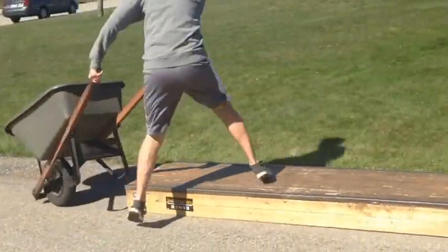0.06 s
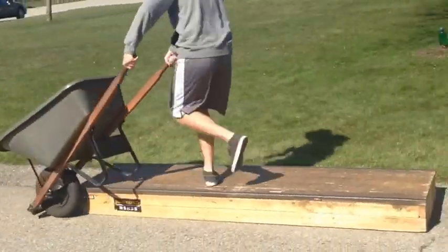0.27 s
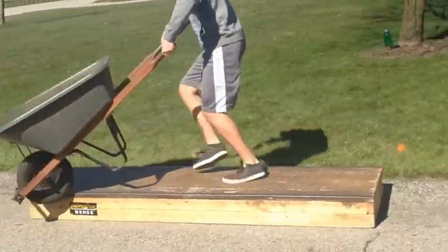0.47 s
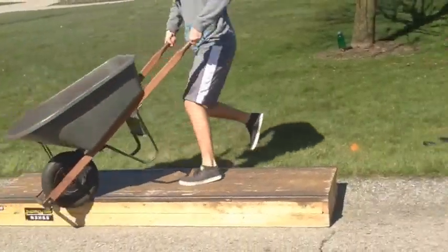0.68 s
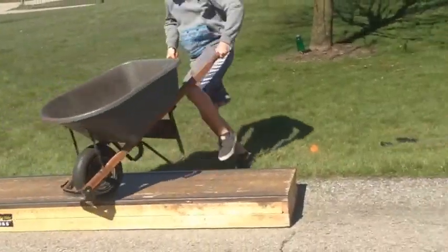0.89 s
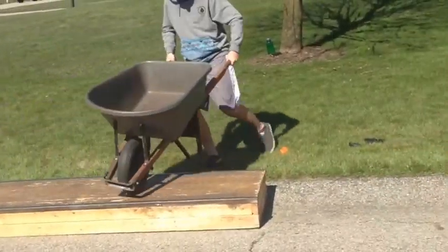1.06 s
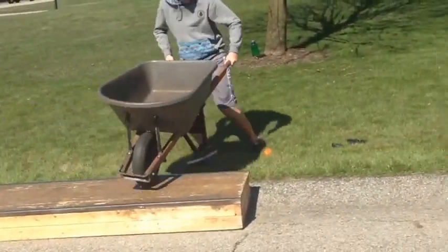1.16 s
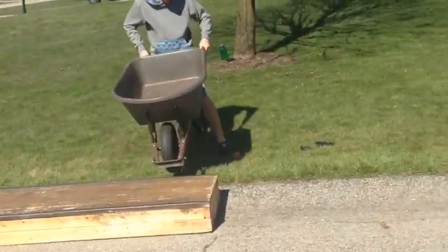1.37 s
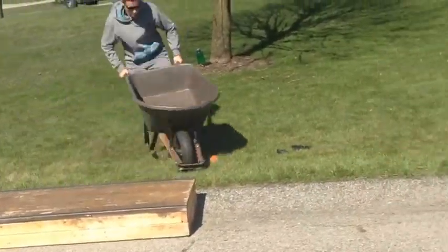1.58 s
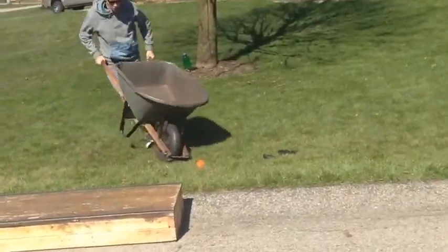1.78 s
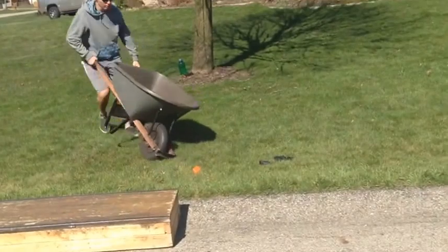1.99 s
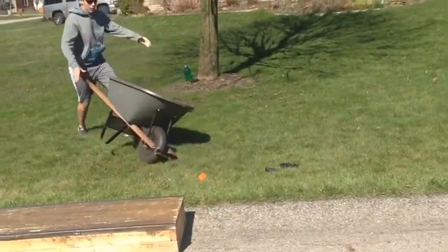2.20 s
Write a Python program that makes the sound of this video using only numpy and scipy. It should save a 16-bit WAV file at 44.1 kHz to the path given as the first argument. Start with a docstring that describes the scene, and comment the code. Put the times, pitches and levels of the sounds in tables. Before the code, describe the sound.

A wheelbarrow bumps and crashes onto a hollow wooden platform, rattles along, then drops onto grass

```python
"""Shoes and tyre scuff, then a wheelbarrow bumps onto a hollow wooden platform and crashes down.
It rolls along the creaking boards and drops off onto grass, while loose steel parts clank to the end.
Blows are bursts of noise with ringing tray modes; deck booms are decaying low tones with a hollow knock.
Creaks are sagging chirps with rasp, clanks are chattering steel modes, scuffs are clumped noise.
Rolling is coloured noise at a varying level, and faint coloured noise is the open air throughout."""
import sys
import numpy as np
from scipy import signal
from scipy.fft import rfft, irfft
from scipy.io import wavfile

SR = 44100
rng = np.random.default_rng(int(sys.argv[2]) if len(sys.argv) > 2 else 0)


def wav_out(sig):
    """Save sig, one row per channel (or a flat mono array), as 16-bit PCM at SR to the path in sys.argv[1]."""
    wavfile.write(sys.argv[1], SR, np.round(np.clip(np.atleast_2d(sig).T, -1, 1) * 32767).astype(np.int16))


N = 99225  # samples, 2.25 s

# Spectrum of the open air. Each row: frequency in Hz, relative density in dB per Hz.
AIR_SPECTRUM = [(20, 1), (50, 9.5), (110, 1), (300, -12), (1000, -11.5), (3000, -13.5), (6000, -26.5),
                (10000, -38), (15500, -42)]
AIR_DB = -52

# Rolling. Each row: time in seconds, level of the tyre's rumble in dB, level of the frame's rattle in dB.
ROLLING_LEVELS = [(0, -48.5, -50.5), (.38, -42, -48.5), (.55, -34.5, -34.5), (0.722, -38, -42.5),
                  (.9, -37.5, -41.5), (1.2, -44, -31), (1.42, -43.5, -48.5), (1.65, -42.5, -53),
                  (1.92, -44, -47.5), (2.03, -47, -48), (2.15, -47.5, -56.5), (2.25, -55, -41.5)]
# Spectrum of the tyre's rumble. Each row: frequency in Hz, relative density in dB per Hz.
RUMBLE_SPECTRUM = [(20, -61), (45, -10), (70, 1.5), (110, 1.5), (170, -5.5), (300, -11), (700, -54.5),
                   (3000, -60)]
# Spectrum of the frame's rattle. Each row: frequency in Hz, relative density in dB per Hz.
RATTLE_SPECTRUM = [(100, 23), (350, 3.5), (700, 10), (1200, -6), (2000, -8.5), (3200, -5), (5000, -14),
                   (7500, -39.5), (15500, -48)]
RATTLE_ROUGH, RATTLE_SWAY_DB, RATTLE_SWAYS_PER_S = 0.42, 1, 44.14

# Scuffs of shoes and tyre. Each row: start in seconds, length in seconds, level in dB, treble in dB.
SCUFF_EVENTS = [(0.072, 0.051, -46, 1), (0.135, 0.052, -46, 20), (0.159, 0.041, -31.5, 8.5),
                (.279, 0.019, -38.5, -7.5), (0.3344, 0.016, -39, -5), (0.403, 0.031, -24.5, 0),
                (0.558, 0.12, -34, -3), (0.765, 0.042, -44.5, 1), (0.7943, 0.026, -35, 10.5),
                (0.929, 0.06, -39, 10), (1.498, 0.048, -38.5, 2), (1.746, 0.096, -41, -6.5),
                (1.848, 0.06, -45.5, -8), (2.207, 0.055, -50, -3)]
# Spectrum of a scuff. Each row: frequency in Hz, relative density in dB per Hz.
SCUFF_SPECTRUM = [(80, -40), (400, 11.5), (900, 6.5), (1800, 5.5), (3000, 5), (4500, -5), (7000, -25.5),
                  (10000, -41), (15500, -49)]
SCUFF_RISE_S, SCUFF_ROUGH = 0.002, 0.2

# Contacts of loose steel parts. Each row: start in seconds, level in dB, treble in dB,
# chatter length in seconds, frequency favoured among the modes in Hz, jingle level in dB.
CLANK_EVENTS = [(.829, -33.5, 8.5, 0.018, 1500, -69), (0.925, -43, 15, 0.0056, 4400, -53),
                (1.069, -27.5, 0.5, 0.016, 1435, -44), (1.232, -49.5, 17, .004, 7100, -59),
                (1.507, -43.5, -14, .015, 1520, -54), (1.587, -40.5, 1, .01, 1030, -52.5),
                (1.788, -44.5, -5, 0.025, 3095, -56), (1.890, -31, -5, 0.012, 880, -39.5),
                (1.9855, -43.5, 11, .004, 3160, -58), (2.088, -50.5, 2, 0.0033, 3040, -60),
                (2.2, -51.5, 2, .004, 3095, -63), (2.23, -47.5, -7, 0.022, 860, -57.5)]
# Modes of the steel. Each row: frequency in Hz, relative level in dB, 60 dB decay time in seconds.
STEEL_MODES = [(467, -1.5, 0.078), (697, 3, 0.12), (872, 0, 0.15), (974, 0, 0.087), (1501, -5.5, 0.16),
               (1585, -2, 0.13), (2059, -13, 0.48), (2187, -8, 0.96), (3070, -2.5, 0.18),
               (4370, -8.5, 0.17), (4810, -8.5, 0.11), (4970, -13, 0.19), (7200, -23.5, 0.15),
               (7500, -25, 0.11), (7730, -28, 0.095)]
STEEL_PAIR_SPLIT, STEEL_PAIR_DB = 0.025, -5  # relative spread of the neighbour modes, their level
STEEL_FOCUS_DB, STEEL_FOCUS_OCTAVES = 8, 0.11
CHATTER_DEPTH, CHATTER_PER_S = 0.56, 364
# Spectrum of the jingle. Each row: frequency in Hz, relative density in dB per Hz.
JINGLE_SPECTRUM = [(1500, -15), (3500, -4.5), (4600, 11), (6000, -8), (7500, 0.5), (8800, -15),
                   (11000, -17), (15500, -29)]
JINGLE_T60_S = 0.076

# Joints slipping under load. Each row: start in seconds, level in dB, nominal pitch in Hz,
# 60 dB decay time in seconds.
CREAK_EVENTS = [(.0728, -36, 3100, 0.031), (.134, -26, 4770, 0.0085), (.2015, -17, 2240, 0.031),
                (0.433, -11, 3340, 0.019), (0.544, -17.5, 4140, 0.012), (0.6177, -20, 3410, 0.014),
                (.6435, -18, 3636, 0.0081), (0.668, -23.5, 3710, 0.013), (.9530, -18.5, 2534, 0.023),
                (0.9606, -22.5, 2575, 0.042), (0.9877, -27.5, 2600, 0.028), (1.143, -25.5, 3650, 0.028),
                (1.222, -24, 2540, 0.017), (1.23, -21.5, 2560, 0.023), (1.244, -27, 2510, 0.013),
                (1.260, -33, 2500, .018), (1.269, -32.5, 2470, .018), (1.352, -39.5, 2740, .025),
                (1.6495, -25, 3685, .025), (1.6795, -34, 3750, .018)]
CREAK_RISE_S, CREAK_WIDTH, CREAK_TOP_HZ = 0.0005, 0.41, 6040  # width relative to the pitch
CREAK_TONE_DB, CREAK_NOISE_DB = -2, -1
CREAK_SAG, CREAK_SAG_S = 0.313, 0.0053  # total fall as a share of nominal pitch, its time constant

# Wheel and feet on deck and ground. Each row: start in seconds, level in dB, pitch in Hz,
# 60 dB decay time in seconds, level of the boards' hollow knock in dB.
THUD_EVENTS = [(0.211, -15, 91, 0.17, -29), (.447, 0, 107, 0.077, -18), (.457, -5, 102.3, 0.086, -14.5),
               (0.486, -23, 187.5, 0.29, -20), (0.519, -24, 122, 0.28, -33), (.595, -20.5, 85.5, 0.2, -39),
               (0.776, -24, 85, 0.089, -30), (0.834, -29, 89, 0.2, -22.5), (.944, -13.5, 86.3, 0.11, -30.5),
               (.974, -21.5, 102.5, 0.67, -31), (1.145, -19.5, 70, 0.093, -35),
               (1.213, -11.5, 100, 0.13, -22.5), (1.248, -8.5, 105, 0.12, -36),
               (1.335, -23.5, 106, 0.15, -48), (1.451, -35, 111, 0.098, -54), (1.509, -46, 107, 0.12, -33),
               (1.604, -27, 79, 0.11, -48), (1.652, -29, 128, .14, -38), (2.061, -33.5, 93.8, 0.18, -50)]
THUD_RISE_S, THUD_OVERTONE, THUD_OVERTONE_DB = 0.0041, 1.9, -15  # overtone as a ratio of pitch
# Spectrum of the hollow knock. Each row: frequency in Hz, relative density in dB per Hz.
BOARD_SPECTRUM = [(100, -11), (170, -2), (230, -5.5), (280, -2.5), (370, 2.5), (500, -4), (700, -10),
                  (1200, -24), (4000, -62)]
BOARD_T60_S = 0.15

# Blows on frame and tray. Each row: start in seconds, level in dB, bass in dB, treble in dB,
# 60 dB decay time in seconds, level of the tray's ring in dB.
KNOCK_EVENTS = [(0.2012, -21.5, -1, -14, 0.094, -37), (.4335, -10, -17, 1.5, 0.12, -18.5),
                (.452, -13, -4, 8.5, 0.22, -15.5), (.478, -10, 10.5, 5.5, 0.15, -23),
                (.496, -15.5, -6, 6.5, 0.071, -31.5), (.505, -14, -8, 7, 0.02, -49),
                (.526, -28, 6, 12.5, 0.36, -32), (.644, -30, -11, -5, .06, -37),
                (0.8264, -21, 5.5, 2.5, .13, -34), (.838, -33, 7, 2, 0.07, -35),
                (1.0284, -24, 9, -5.5, 0.18, -35), (1.069, -31.5, 0, -8, 0.2, -37.5),
                (1.144, -30, -2, 0.5, 0.15, -39), (1.216, -26.5, 18, -2, 0.057, -39.5),
                (1.232, -27.5, 16, -7, 0.12, -34.5), (1.257, -37, 22, 10, .06, -50),
                (1.351, -42, -28, -3, 0.16, -54), (1.4736, -35.5, 19, -4, 0.15, -43),
                (1.587, -34, -12, -17, .12, -71), (1.647, -25.5, 12, 7.5, 0.097, -36.5),
                (1.662, -28.5, 10, -42, 0.2, -66), (1.68, -41, 3, 26, .04, -52),
                (1.896, -27, 2.5, -28, .11, -60)]
# Spectrum of a blow. Each row: frequency in Hz, relative density in dB per Hz.
KNOCK_SPECTRUM = [(60, -9), (200, -0.5), (350, 1.5), (560, 1.5), (850, -0.5), (1150, -5), (1450, 0.5),
                  (2000, -2.5), (2800, -4), (4000, -6), (5200, -15.5), (7000, -28.5), (10000, -41),
                  (15500, -55)]
# Modes of the tray. Each row: frequency in Hz, relative level in dB, 60 dB decay time in seconds.
TRAY_MODES = [(195.7, 0.5, 0.42), (230.6, -3.5, 0.28), (273.9, -6.5, 0.5), (342, -0.5, 0.35),
              (383, 3.5, 0.26), (447, -1, 0.32), (513, -11, .3), (679.8, -5.5, 0.31), (724, -6, 0.22),
              (809, -5.5, 0.28), (861, -10, 0.36), (1300, -8.5, 0.27), (1600, -10, 0.22)]
KNOCK_ROUGH, KNOCK_RISE_S = 0.42, 0.00042
SNAP_DB, SNAP_T60_S = -10, 0.014
SHUDDER_DB, SHUDDER_T60_S, SHUDDER_TREBLE_DB = -17.5, 0.38, -10

BASS_HZ, TREBLE_HZ = 486, 2820
LOW_CUT_HZ, TOP_HZ, CLIP_LEVEL = 39, 15500, 1.1


def undb(db):
    """Amplitude ratio is ten to the power of decibels over twenty."""
    return 10 ** (np.asarray(db) / 20)


def unit(x):
    """Normalisation: dividing by the root mean square gives rms 1."""
    return x / np.sqrt(np.mean(x ** 2) + 1e-18)


def clock():
    """Time axis in seconds."""
    return np.arange(N) / SR


def fade(t60):
    """Exponential damping: the amplitude falls by 60 dB in t60 seconds."""
    return np.exp(-np.log(1000) * clock() / max(t60, 1e-3))


def add(out, start, x):
    """Superposition: mixes x into out from the given time on."""
    i = int(np.clip(start * SR, 0, N - 1))
    out[i:] += x[:N - i]


def bins():
    """Frequencies of the spectrum in Hz, never below 1."""
    return np.maximum(np.fft.rfftfreq(N, 1 / SR), 1)


def colour(x, points, extra_db=0):
    """Spectral shaping: weights x by (Hz, dB) points along log frequency, at rms 1."""
    hz, db = np.array(points, float).T
    gain_db = np.interp(np.log(bins()), np.log(hz), db) + extra_db
    return unit(irfft(rfft(x) * undb(gain_db), N))


def shelves(hz, bass_db, treble_db):
    """Shelving response: gain in dB of a bass shelf and a steeper treble shelf."""
    bass = bass_db / (1 + (hz / BASS_HZ) ** 2)
    treble = treble_db / (1 + (TREBLE_HZ / hz) ** 4)
    return bass + treble


def walk(rate):
    """Random modulation: straight lines join chance values, rate a second, with spread near 1."""
    return 1.2 * np.interp(clock() * rate, np.arange(8192), rng.standard_normal(8192))


def grit(rough):
    """Amplitude modulation: noise comes in millisecond clumps, as from many tiny contacts."""
    return rng.standard_normal(N) * np.exp(rough * walk(700))


def ring(modes, hold=0):
    """Modal superposition: half a second of random-phase modes, held and then damped; onset rms near 1."""
    t = clock()[:SR // 2]
    hz, db, t60 = np.array(modes, float).T[:, :, None]
    envelope = undb(db - 60 * np.maximum(t - hold, 0) / t60)
    partials = envelope * np.sin(2 * np.pi * (hz * t + rng.random(hz.shape)))
    return np.pad(partials.sum(0), (0, N - len(t))) / np.sqrt(np.sum(undb(db) ** 2) / 2)


def air():
    """Broadband background: the open air is steady noise weighted towards the bass."""
    return undb(AIR_DB) * colour(rng.standard_normal(N), AIR_SPECTRUM)


def rolling():
    """Continuous excitation: the tyre rumbles and keeps the frame rattling at varying levels."""
    times, rumble_db, rattle_db = np.array(ROLLING_LEVELS).T
    rumble_gain = undb(np.interp(clock(), times, rumble_db))
    rumble = rumble_gain * colour(rng.standard_normal(N), RUMBLE_SPECTRUM)
    sway_db = RATTLE_SWAY_DB * walk(RATTLE_SWAYS_PER_S)
    rattle_gain = undb(np.interp(clock(), times, rattle_db) + sway_db)
    rattle = rattle_gain * colour(grit(RATTLE_ROUGH), RATTLE_SPECTRUM)
    return rumble + rattle


def scuffs():
    """Friction noise: rubber drags briefly over grit, wood and grass in many small contacts."""
    out, t = np.zeros(N), clock()
    for start, length, db, treble_db in SCUFF_EVENTS:
        rise = 1 - np.exp(-t / SCUFF_RISE_S)
        fall = np.exp(-np.minimum(2 * (t / length) ** 2, 50))
        rub = colour(grit(SCUFF_ROUGH), SCUFF_SPECTRUM, shelves(bins(), 0, treble_db))
        add(out, start, undb(db) * rise * fall * rub)
    return out


def clanks():
    """Modal ringing: steel parts chatter with a grainy jingle, then ring in pairs of close modes."""
    out, rise = np.zeros(N), 1 - np.exp(-clock() / 0.0002)
    hz, mode_db, t60 = np.array(STEEL_MODES, float).T
    for start, db, treble_db, length, focus_hz, jingle_db in CLANK_EVENTS:
        octaves_off = np.log2(hz / focus_hz)
        focus = STEEL_FOCUS_DB * np.exp(-(octaves_off / STEEL_FOCUS_OCTAVES) ** 2)
        struck = mode_db + shelves(hz, 0, treble_db) + focus
        neighbours = hz * (1 + STEEL_PAIR_SPLIT * rng.standard_normal(len(hz)))
        # No neighbour rings longer than 0.1 s.
        pairs = zip(neighbours, struck + STEEL_PAIR_DB, np.minimum(t60, .1))
        modes = [*zip(hz, struck, t60), *pairs]
        # Full contact for the chatter length, then a decay.
        contact = np.minimum(1, fade(JINGLE_T60_S) * undb(60 * length / JINGLE_T60_S))
        chatter = 1 + CHATTER_DEPTH * contact * walk(CHATTER_PER_S)
        tone = undb(db) * ring(modes, length) * chatter
        jingle = undb(jingle_db) * contact * colour(grit(KNOCK_ROUGH), JINGLE_SPECTRUM)
        add(out, start, rise * (tone + jingle))
    return out


def creaks():
    """Stick-slip: each slip of a joint is a dry tick of resonant noise and a chirp that sags in pitch."""
    out, f, t = np.zeros(N), bins(), clock()
    rise = 1 - np.exp(-(t / CREAK_RISE_S) ** 2)
    for start, db, hz, t60 in CREAK_EVENTS:
        resonance = 1 / (1 + ((f / hz - hz / f) / CREAK_WIDTH) ** 2)
        body = resonance / (1 + (f / CREAK_TOP_HZ) ** 6)
        rasp = unit(irfft(rfft(rng.standard_normal(N)) * body, N))
        # The pitch starts above its nominal value and settles below it.
        pitch = hz * (1 + CREAK_SAG * (np.exp(-t / CREAK_SAG_S) - .7))
        chirp = np.sin(2 * np.pi * np.cumsum(pitch) / SR)
        slip = undb(CREAK_NOISE_DB) * rasp + undb(CREAK_TONE_DB) * chirp
        add(out, start, undb(db) * slip * fade(t60) * rise)
    return out


def thuds():
    """Damped oscillation: heavy contacts swell into a low boom with a hollow knock of the boards."""
    out, t = np.zeros(N), clock()
    rise = 1 - np.exp(-(t / THUD_RISE_S) ** 2)
    for start, db, hz, t60, board_db in THUD_EVENTS:
        phase = 2 * np.pi * hz * t
        overtone = undb(THUD_OVERTONE_DB) * np.sin(THUD_OVERTONE * phase)
        boom = undb(db) * (np.sin(phase) + overtone) * fade(t60)
        wood = undb(board_db) * colour(rng.standard_normal(N), BOARD_SPECTRUM) * fade(BOARD_T60_S)
        add(out, start, (boom + wood) * rise)
    return out


def knocks():
    """Impact excitation: each blow cracks in the frame, leaves a shudder and rings the tray's modes."""
    out, rise = np.zeros(N), 1 - np.exp(-clock() / KNOCK_RISE_S)
    for start, db, bass_db, treble_db, t60, tray_db in KNOCK_EVENTS:
        tone_db = shelves(bins(), bass_db, treble_db)
        crack_decay = fade(t60) + undb(SNAP_DB) * fade(SNAP_T60_S)
        crack = colour(grit(KNOCK_ROUGH), KNOCK_SPECTRUM, tone_db) * crack_decay
        dull_db = tone_db + shelves(bins(), 0, SHUDDER_TREBLE_DB)
        shudder = colour(rng.standard_normal(N), KNOCK_SPECTRUM, dull_db) * fade(SHUDDER_T60_S)
        frame = undb(db) * (crack + undb(SHUDDER_DB) * shudder)
        tray = undb(tray_db) * ring(TRAY_MODES)
        add(out, start, rise * (frame + tray))
    return out


def scene():
    """Superposition: the wheelbarrow's sounds add to the quiet outdoor air, in one channel."""
    return (air() + rolling() + scuffs() + clanks() + creaks() + thuds() + knocks())[None]


def record(dry):
    """Band limiting and saturation: the microphone drops deep bass, rounds peaks and cuts the top."""
    low_cut = signal.butter(2, LOW_CUT_HZ, "high", fs=SR, output="sos")
    heard = signal.sosfilt(low_cut, dry)
    rounded = CLIP_LEVEL * np.tanh(heard / CLIP_LEVEL)
    top_cut = signal.ellip(8, .2, 70, TOP_HZ, fs=SR, output="sos")  # ripple and rejection in dB
    return signal.sosfilt(top_cut, rounded)


dry = scene()
out = record(dry)
wav_out(out)
```